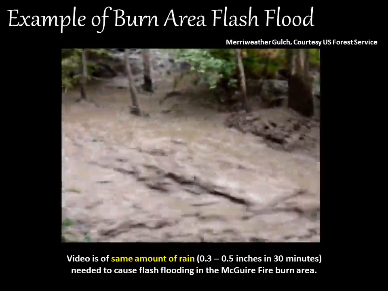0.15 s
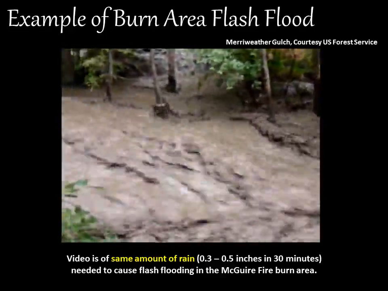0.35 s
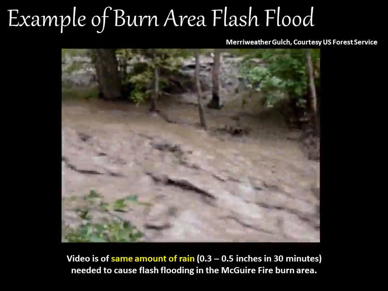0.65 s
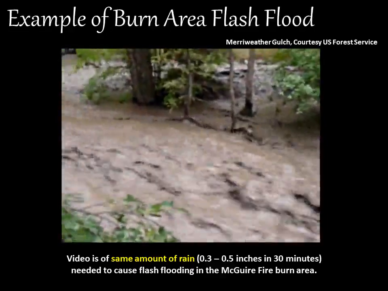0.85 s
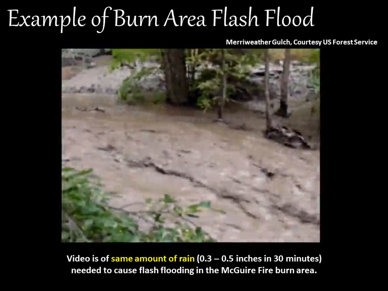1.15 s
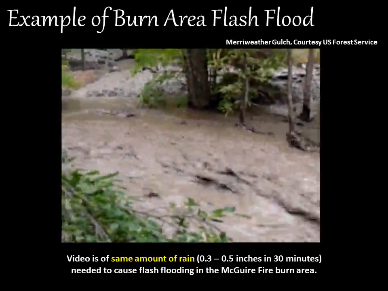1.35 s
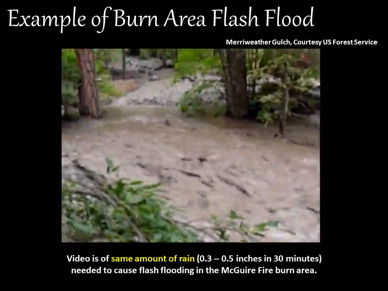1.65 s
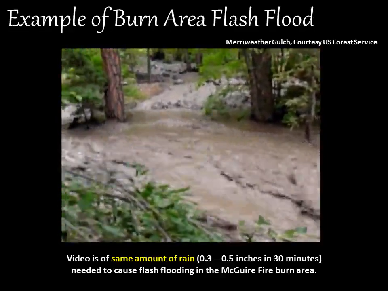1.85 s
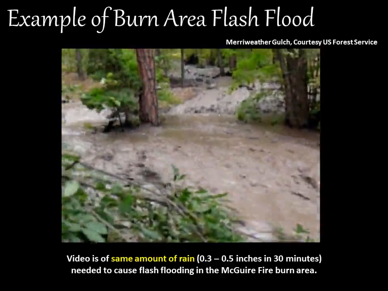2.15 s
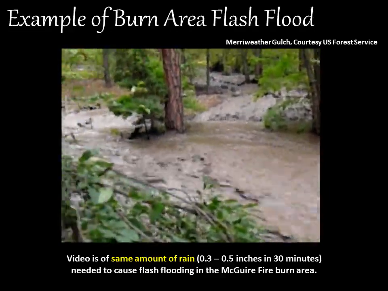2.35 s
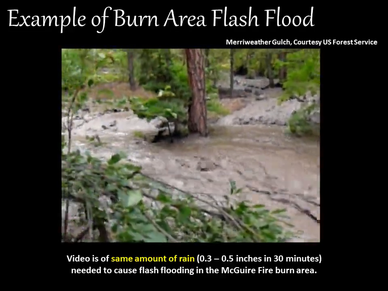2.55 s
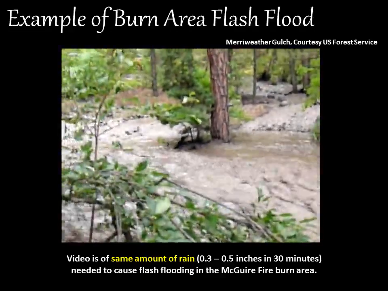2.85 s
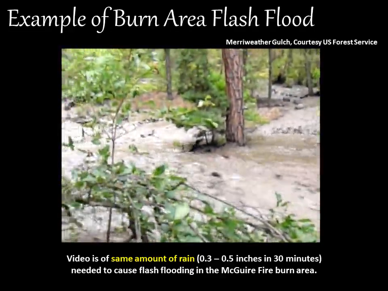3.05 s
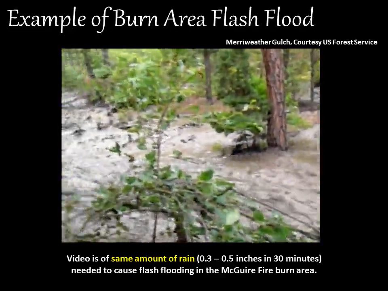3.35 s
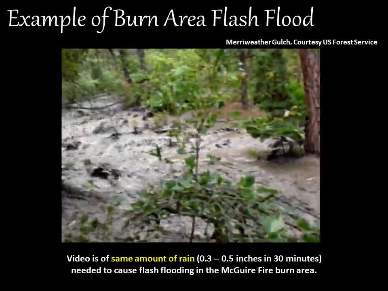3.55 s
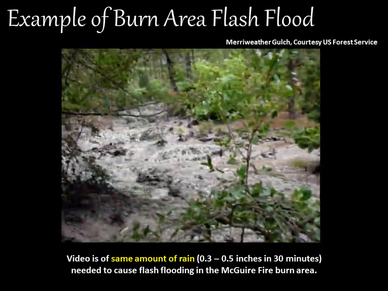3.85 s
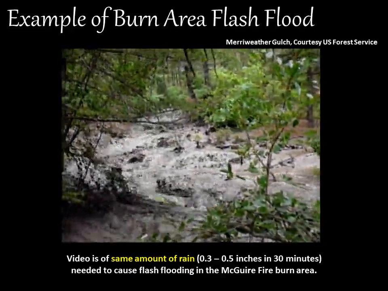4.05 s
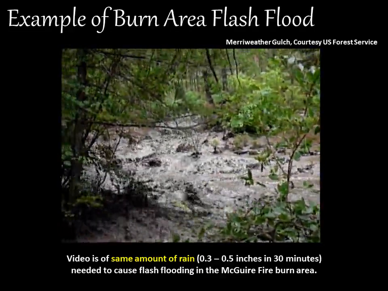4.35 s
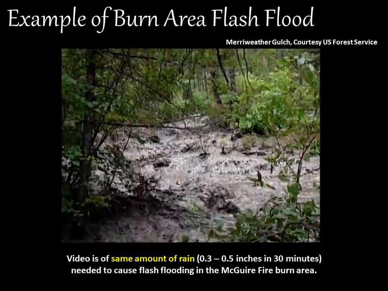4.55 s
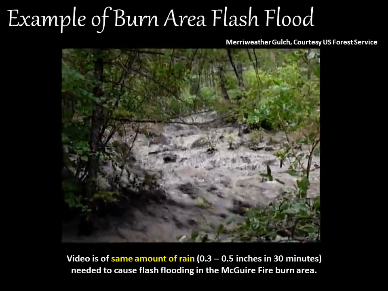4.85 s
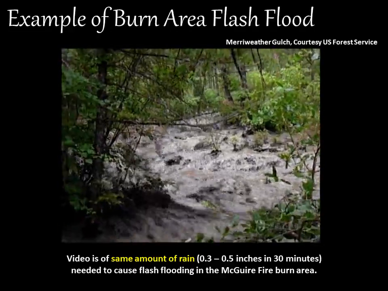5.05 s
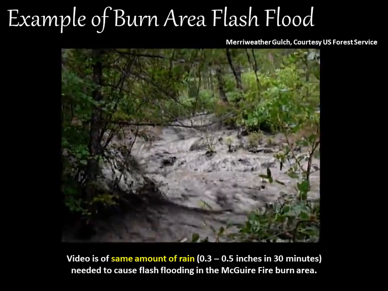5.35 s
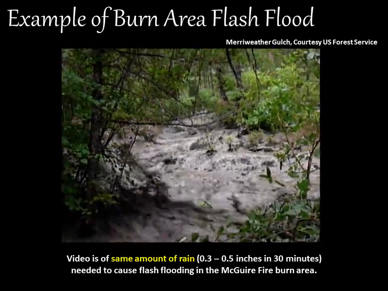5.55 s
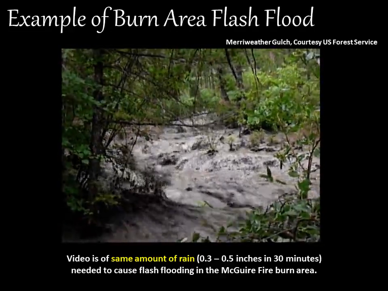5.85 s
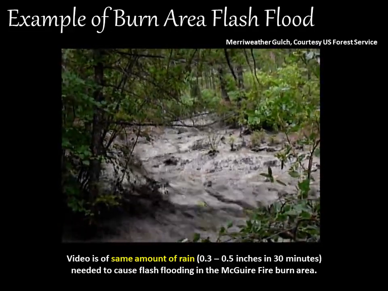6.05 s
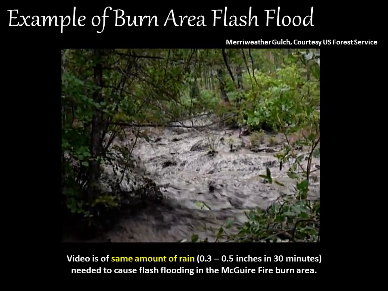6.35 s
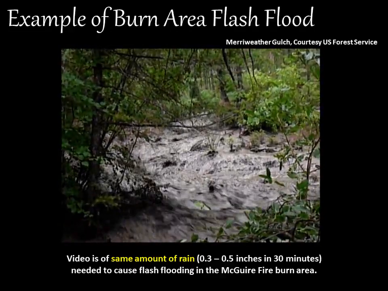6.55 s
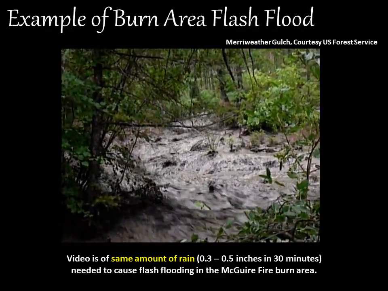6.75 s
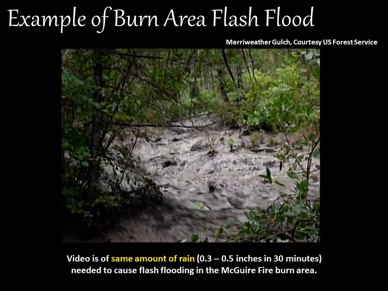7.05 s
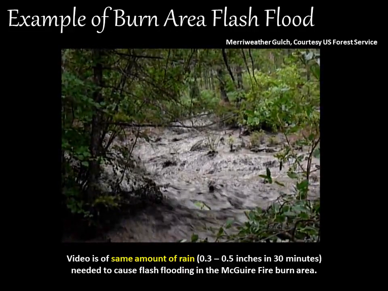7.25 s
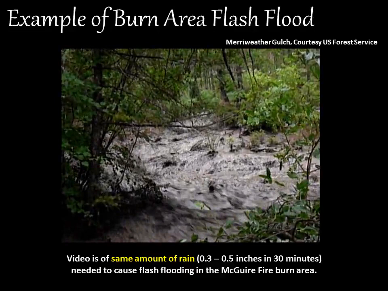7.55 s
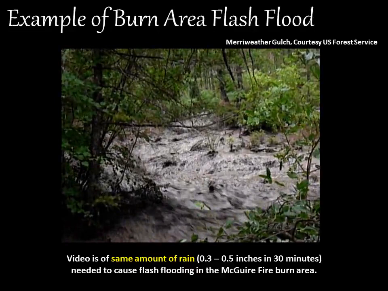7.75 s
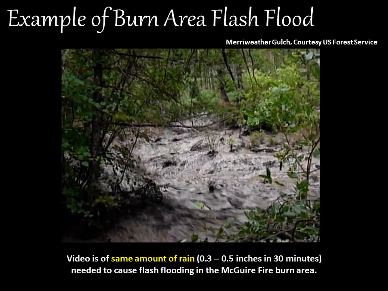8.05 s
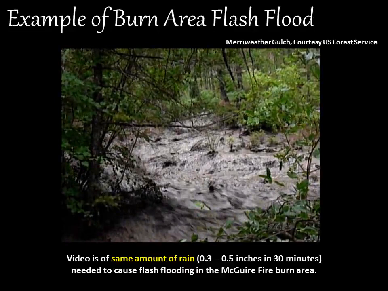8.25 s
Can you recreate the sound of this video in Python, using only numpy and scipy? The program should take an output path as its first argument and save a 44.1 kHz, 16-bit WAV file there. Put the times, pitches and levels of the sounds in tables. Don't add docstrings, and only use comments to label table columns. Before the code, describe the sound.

Close, loud muddy floodwater roars continuously through woods, hollow and boxy in the midrange, with low rumble, bubbling churn and harsh metallic digital hiss. A loud knock of debris lands early, fainter ones later. Near five seconds the sound suddenly drops, muffled, with a tiny motor whirr, then swells back. After six seconds a click cuts to a farther, much quieter, duller rush. Cheap small camera microphone outdoors.

```python
import sys
import numpy as np
from scipy import signal
from scipy.fft import rfft, irfft, next_fast_len
from scipy.io import wavfile
from scipy.ndimage import uniform_filter1d, map_coordinates

SR = 44100
rng = np.random.default_rng(int(sys.argv[2]) if len(sys.argv) > 2 else 0)


def store_pcm(level_fs):
    pcm = np.round(np.clip(level_fs, -1, 1) * 32767).astype(np.int16)
    wavfile.write(sys.argv[1], SR, np.atleast_2d(pcm).T)


def attenuation_scalar(level_db):
    decades = np.asarray(level_db, float) / 20
    return 10 ** decades


N = 370440

# f/Hz, density/dB per Hz
RUMBLE = [(12, -29), (20, 0), (22, -8), (65, -5), (86, -0.5), (97, -8.5), (124, 2), (151, -7), (200, -6.5),
          (260, -33), (440, -120)]
CHURN = [(76, -42), (130, -12), (297, -5.5), (460, -5), (580, -3.5), (750, -19), (1280, -120)]
ROAR = [(310, -27), (520, -14.5), (610, -7), (660, -1.5), (690, 1.5), (730, -2.5), (824, -18.5), (880, -14),
        (928, -7), (985, -11.5), (1050, -24), (1160, -32), (1510, -50), (2550, -120)]
SPLASH = [(660, -41), (1120, -8.5), (1170, -14), (1250, 1.5), (1340, -5.5), (1475, -18.5), (1600, -8),
          (1690, -3), (1750, 2.5), (1830, -4.5), (1980, -12), (2150, -16), (2350, -37.5), (4000, -120)]
NEAR_HISS = [(900, -14), (2200, 0.5), (2900, 3.5), (3700, 3), (4000, -10.5), (8000, -21.5), (15500, -23)]

# f/Hz, density/dB per Hz
FAR_CHURN = [(76, -34), (130, -17), (151, -29), (199, -11.5), (231, 3.5), (269, -8), (301, 2), (332, -14.5),
             (360, 1.5), (393, -4.5), (427, 1.5), (535, -7.5), (580, -8), (750, -29), (1280, -120)]
FAR_ROAR = [(310, -42), (520, -7), (534, -14), (564, -3.5), (634, -4), (651, -5), (708, 0), (757, -5.5),
            (788, -17.5), (890, -17), (911, -15), (964, -11), (1040, -30.5), (1160, -33), (1510, -63),
            (2550, -120)]
FAR_SPLASH = [(610, -38), (1040, -22), (1080, -17), (1180, -0.5), (1350, -0.5), (1450, -5.5), (1610, -4),
              (1680, -1), (1750, 7), (1800, -1), (1990, -8), (2090, -6.5), (2350, -20), (3060, -45),
              (5170, -120)]
FAR_HISS = [(1350, -27), (2300, -3), (2630, -5.5), (2830, -3.5), (3530, -5), (5160, -11.5), (8110, -18.5),
            (9600, -23), (11000, -34), (12200, -28), (13600, -22), (16500, -21)]

# near level/dB, far level/dB, share of the surge/1, share of the duck/1
RUMBLE_LEVEL = (-44, -43, -0.6, -0.5)
CHURN_LEVEL = (-28.5, -39, 0.75, 1)
ROAR_LEVEL = (-20, -34.5, 1.03, 1.38)
SPLASH_LEVEL = (-39, -57.5, .6, 1.6)
HISS_LEVEL = (-50.5, -60.5, .1, 0.26)

# t/s, level/dB
SURGE = [(0, 0), (.8, 0), (1.5, .5), (2.3, 0), (2.9, 0), (3.5, 0), (4.2, 0), (4.8, 0.5), (5.6, 1),
         (6.0, -1.5), (6.39, 0), (6.6, 0.8), (7.1, 0.5), (7.6, 1), (8.0, 1.5), (8.4, 0)]
# t/s, depth/dB, half width/s
LULLS = [
    (1.19, 4, .04),
    (2.71, 4, 0.015),
    (3.6, 4.5, 0.038),
    (4.65, 5, 0.028),
    (5.77, 6, 0.024),
    (6.351, 6, .03),
    (6.47, 0.5, 0.037),
    (7.74, 4, 0.095),
]
# t/s, peak level/dB, f/Hz
THUMPS = [
    (1.292, -10, 250),
    (3.409, -23, 200),
    (3.792, -22, 420),
    (5.471, -25, 190),
]
# start t/s, stop t/s, f/Hz, bandwidth/Hz, level/dB
WHINE = (4.826, 4.878, 3400, 450, -54)
OFFSETS = (.0155, .0062)

DUCK_S, CHANGE_S = 4.8243, 6.3935
DUCK_DB, RECOVER_S = 8.5, 0.26
FAR_MOMENT_S, RETURN_S = .055, .005
FAR_MOMENT_DB = 1
BEAT_HZ, BUFFER_S, SLIP_CYCLES = 3900, 4096 / 48000, .2125
TOP_HZ = 15310


def torrent():
    rumble = coloured(patchy(patchy_db=-0.2), RUMBLE)
    churn = near_or_far(patchy(patchy_db=0.83), CHURN, FAR_CHURN)
    churn = churn + attenuation_scalar(-14.5) * bubbles(152.0, 494, cycles=5.7, count=1500)
    roar = near_or_far(patchy(patchy_db=0.85), ROAR, FAR_ROAR)
    splash = near_or_far(patchy(patchy_db=1.5), SPLASH, FAR_SPLASH)
    water = level(*RUMBLE_LEVEL) * rumble + level(*CHURN_LEVEL) * churn
    return water + level(*ROAR_LEVEL) * roar + level(*SPLASH_LEVEL) * splash


def bubbles(low_hz, high_hz, cycles, count):
    when, pitch, size = rng.random((count, 3)).T[:, :, None]
    t = np.arange(2048) / SR
    turns = low_hz * (high_hz / low_hz) ** pitch * t
    envelope = turns * np.exp(-3 * turns / cycles)
    ring = np.sin(2 * np.pi * turns * (1 + 0.1 * turns / cycles)) * envelope
    ring = attenuation_scalar(-3 * np.log(size)) * ring
    at = (when * N).astype(int) + np.arange(len(t))
    return unit(np.bincount(at.ravel(), ring.ravel(), N + len(t))[:N])


def patchy(patchy_db):
    z = signal.stft(rng.standard_normal(N + 512), nperseg=512)[2]
    field = uniform_filter1d(rng.standard_normal(z.shape), size=4, axis=0)
    field = uniform_filter1d(field, size=6, axis=1)
    return signal.istft(z * attenuation_scalar(patchy_db * unit(field)), nperseg=512)[1][:N]


def level(near_db, far_db, surge, duck):
    t, far = np.arange(N) / SR, distant()
    lull_db = sum(db * np.exp(-((t - s) / w) ** 2) for s, db, w in LULLS)
    flow_db = np.interp(t, *np.transpose(SURGE)) - lull_db
    recovery = np.exp(-np.abs(t - DUCK_S - FAR_MOMENT_S) / RECOVER_S)
    loss_db = (t > DUCK_S) * duck * DUCK_DB * recovery
    far_db = far_db + FAR_MOMENT_DB * (t < CHANGE_S)
    db = far * far_db + (1 - far) * (near_db - loss_db) + surge * flow_db
    return attenuation_scalar(uniform_filter1d(db, size=17))


def distant():
    t = np.arange(N) / SR
    moment = (t > DUCK_S) * np.clip((DUCK_S + FAR_MOMENT_S - t) / RETURN_S + .5, 0, 1)
    return uniform_filter1d(moment, size=17) + (t >= CHANGE_S)


def near_or_far(x, near, far):
    turn = distant() * np.pi / 2
    return np.sin(turn) * coloured(x[::-1], far) + np.cos(turn) * coloured(x, near)


def coloured(x, spectrum):
    m = next_fast_len(N + 8192)
    f, db = np.transpose(spectrum)
    log_f = np.log(np.fft.rfftfreq(m, 1 / SR) + 1)
    gain = attenuation_scalar(np.interp(log_f, np.log(f + 1), db))
    return unit(irfft(rfft(x, m) * gain, m)[:N])


def unit(x):
    return x / np.sqrt(np.mean(x ** 2) + 1e-20)


def debris():
    out, t = np.zeros(N + SR), np.arange(SR // 10) / SR
    for s, db, hz in THUMPS:
        envelope = (1 - np.exp(-t / .004)) * attenuation_scalar(-60 * t / .04)
        knock = np.sin(2 * np.pi * hz * t / (1 + 30 * t)) * envelope
        out[round(s * SR):][:len(t)] += attenuation_scalar(db + 4) * knock
    return out[:N]


def lens():
    start, stop, hz, width_hz, db = WHINE
    t = np.arange(N) / SR
    band = [(hz - 2 * width_hz, -60), (hz - width_hz / 2, 0), (hz + width_hz / 2, 0), (hz + 2 * width_hz, -60)]
    running = (t > start) & (t < stop)
    return attenuation_scalar(db) * running * coloured(rng.standard_normal(N), band)


def scene():
    return (torrent() + debris() + lens())[None]


def overload(x):
    return x / (1 + np.abs(x / 0.43) ** 6.8) ** (1 / 4.5)


def converter_hiss():
    return level(*HISS_LEVEL) * near_or_far(rng.standard_normal(N), NEAR_HISS, FAR_HISS)


def sampling_jitter(x):
    t = np.arange(N) / SR
    saw = (BEAT_HZ * t + SLIP_CYCLES * np.floor(t / BUFFER_S)) % 1 - .5
    return map_coordinates(x, [np.arange(N) + 0.87 * (1 - distant()) * saw], mode="nearest")


def broken_wave():
    t = np.arange(N) / SR
    return attenuation_scalar(-21) * (t < CHANGE_S) * np.exp(np.minimum(t - CHANGE_S, 0) / .0004)


def gated(x, under_db, from_hz):
    hz, t, z = signal.stft(x, SR, nperseg=1024)
    power = np.abs(z) ** 2
    band = uniform_filter1d(uniform_filter1d(power, size=9, axis=0), size=7, axis=1)
    around = uniform_filter1d(power, size=90, axis=0)
    dropped = (band < around * attenuation_scalar(-2 * under_db)) & (hz[:, None] > from_hz)
    top_hz = TOP_HZ + (t < CHANGE_S) * 60 * rng.exponential(size=len(t))
    return signal.istft(z * (~dropped & (hz[:, None] < top_hz)), SR, nperseg=1024)[1][:N]


def roll_off(x):
    return signal.sosfilt(signal.butter(12, 15850, fs=SR, output="sos"), x)


def record(dry):
    x = overload(dry[0]) + converter_hiss()
    x = sampling_jitter(x) + broken_wave()
    x = gated(x, under_db=7.5, from_hz=8800)
    near = np.arange(N) / SR < CHANGE_S
    x = x + uniform_filter1d(np.where(near, *OFFSETS), size=9)
    return roll_off(x[None])


dry = scene()
out = record(dry)
store_pcm(out)
```